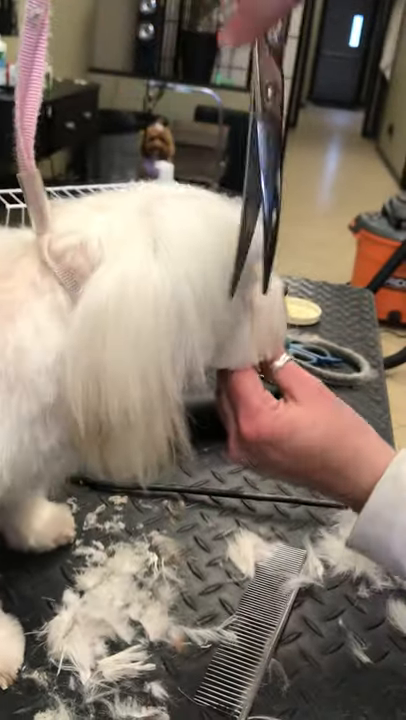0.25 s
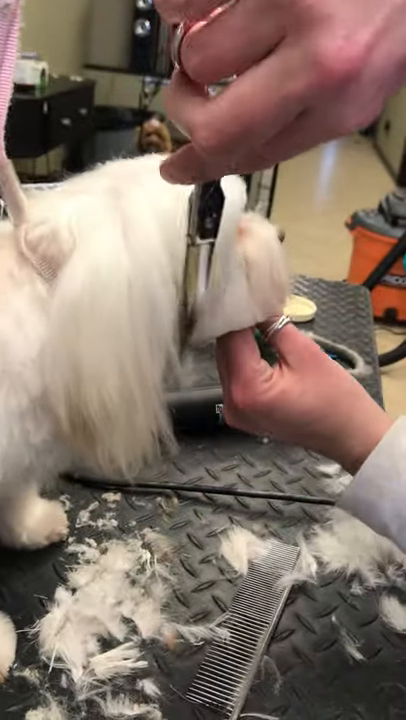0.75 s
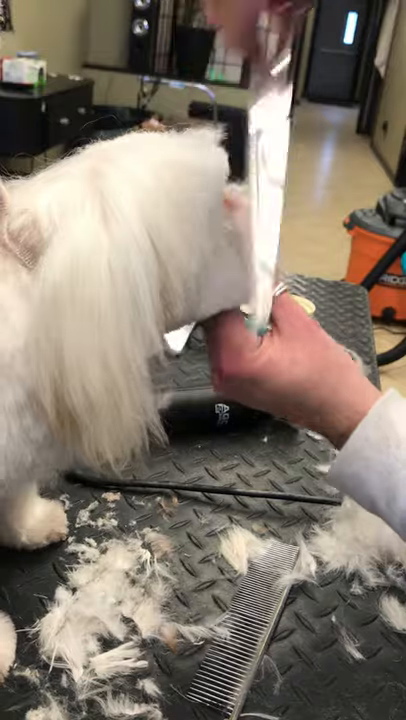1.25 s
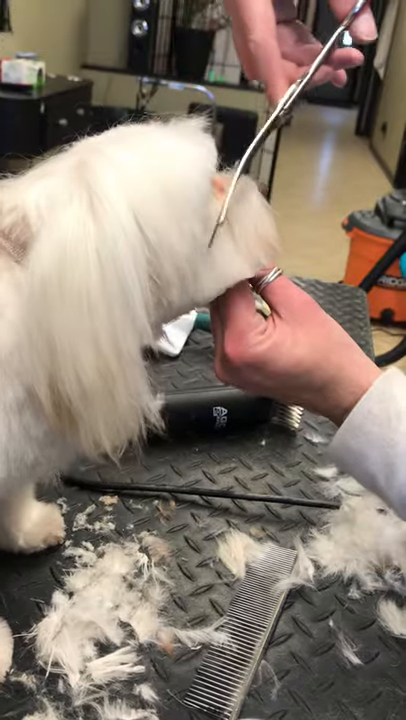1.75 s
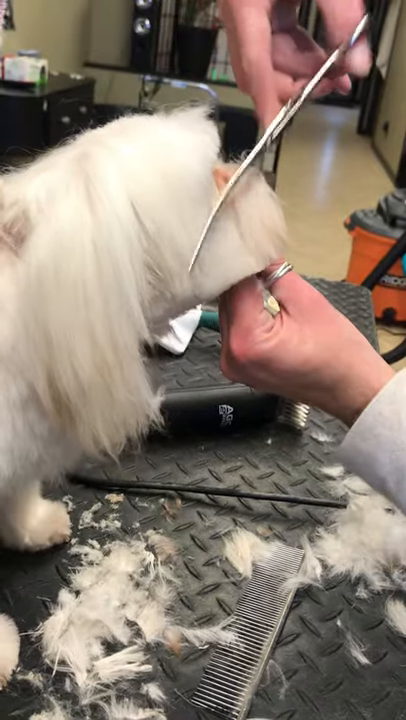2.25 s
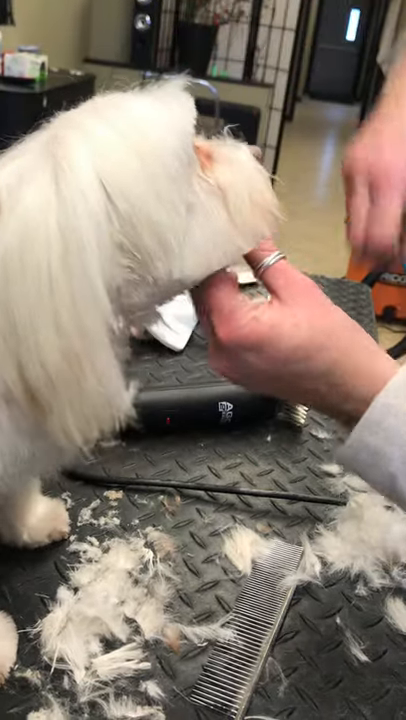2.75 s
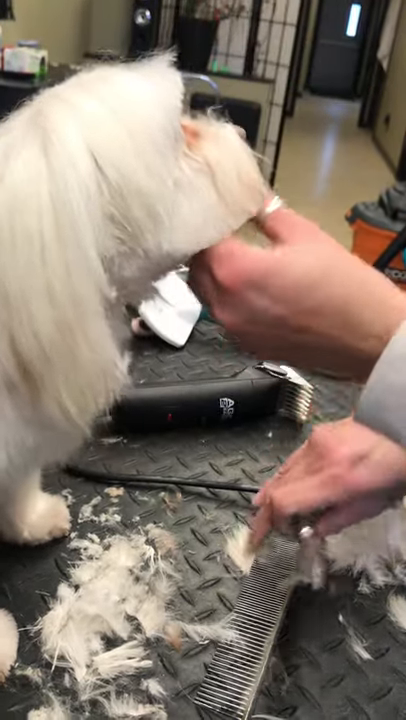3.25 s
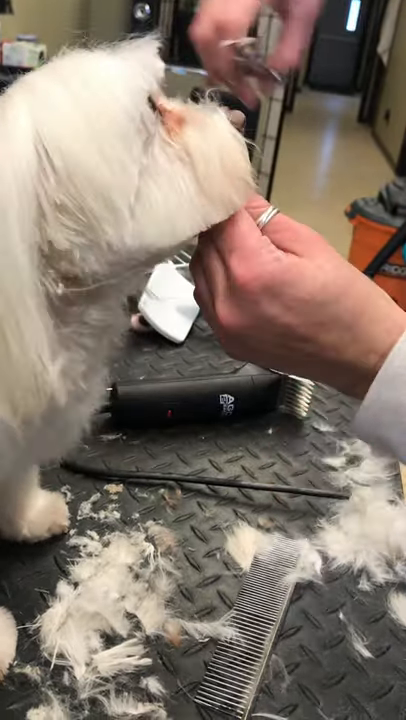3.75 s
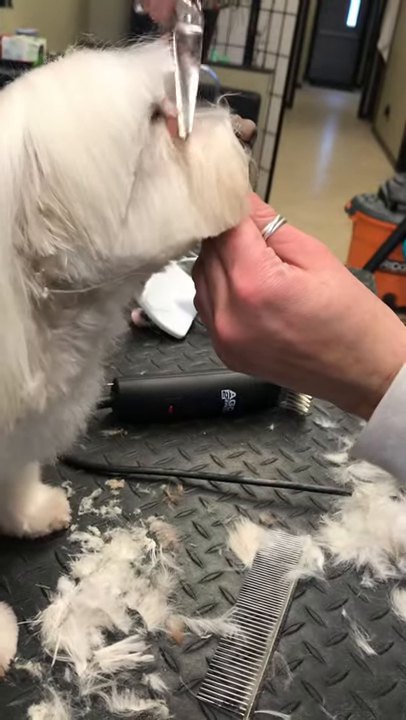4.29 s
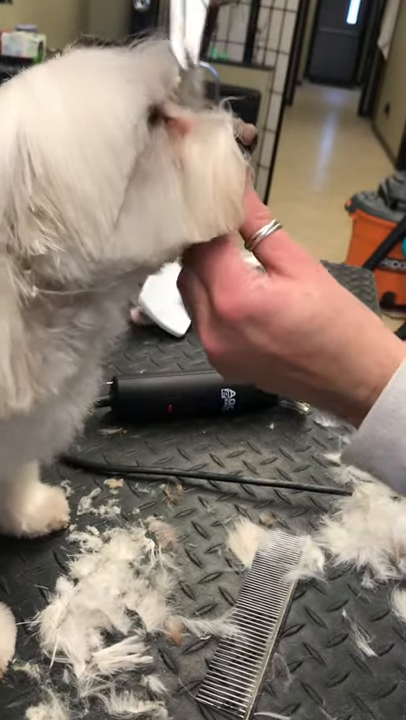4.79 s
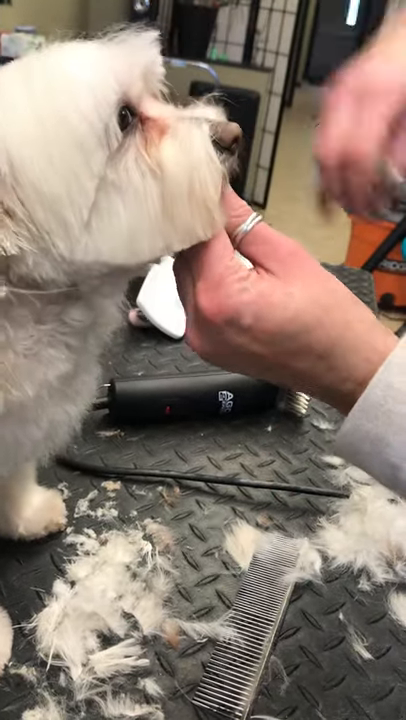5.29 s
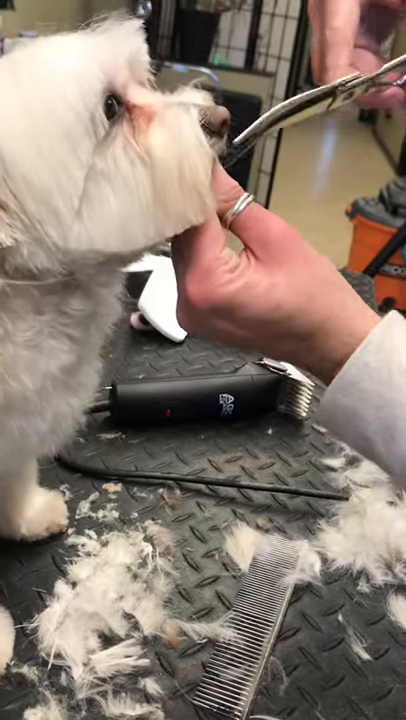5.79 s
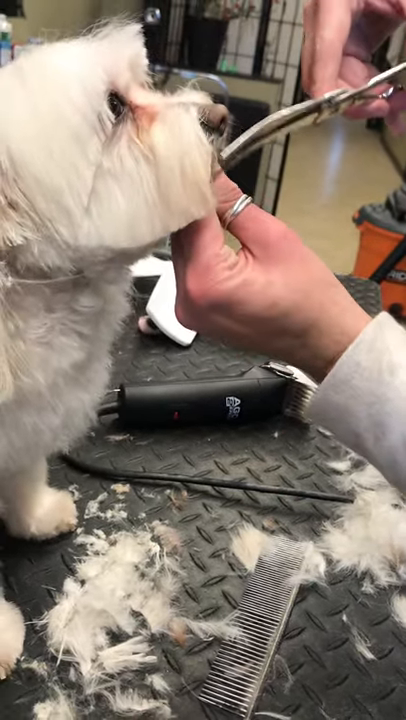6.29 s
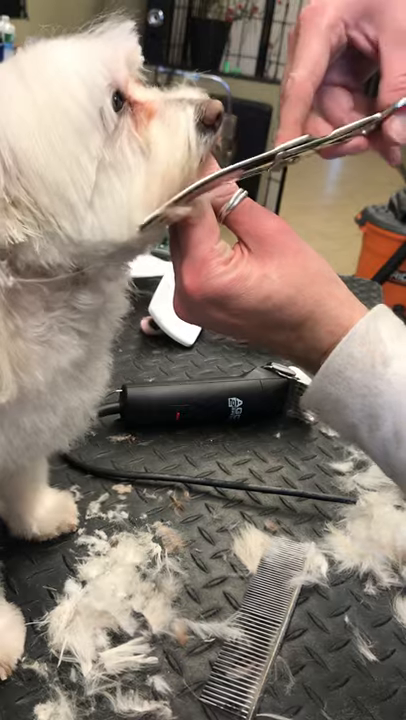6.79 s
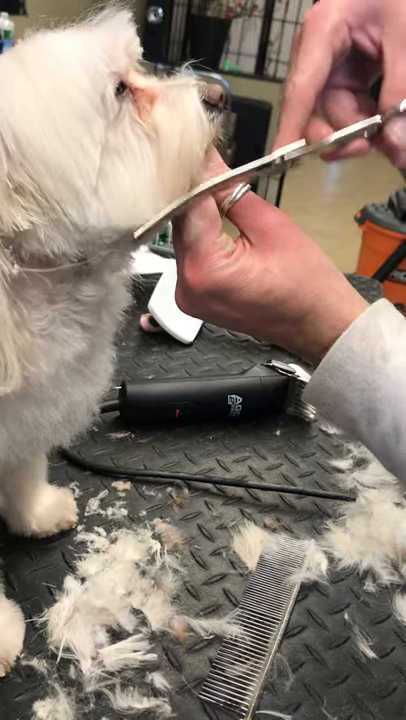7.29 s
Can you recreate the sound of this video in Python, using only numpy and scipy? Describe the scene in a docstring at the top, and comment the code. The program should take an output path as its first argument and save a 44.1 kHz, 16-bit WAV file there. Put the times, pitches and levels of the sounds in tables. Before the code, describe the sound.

Close, crisp steel scissor snips come in spaced runs in a quiet small room, interrupted midway by soft pats and a quick tool clatter.

```python
"""Small room, rubber-topped table: steel grooming scissors trim a small dog's face over ventilation hum.
Blades: stick-slip noise through resonances, scraping open, shearing shut; damped bursts click at the stops.
Midway a steel tool knocks and jingles on the table: noise bursts plus decaying steel and table modes.
Sleeve and coat rustle, hand pats: shaped noise. Ventilation: wavering tones, low rumble, faint hiss."""
import sys
import numpy as np
from scipy import signal
from scipy.fft import rfft, irfft, next_fast_len
from scipy.io import wavfile
from scipy.ndimage import map_coordinates

SR = 44100
rng = np.random.default_rng(int(sys.argv[2]) if len(sys.argv) > 2 else 0)


def dump_mix(stems):
    """Bounce the given channels to the path in sys.argv[1] as a 16-bit WAV at rate SR."""
    frames = np.atleast_2d(stems).T  # one column per channel
    limited = np.clip(frames, -1, 1)  # hard clip at full scale
    pcm = np.round(limited * 32767).astype(np.int16)
    wavfile.write(sys.argv[1], SR, pcm)


N = 332514


def amp(db):
    """dB to amplitude ratio."""
    return 10 ** (np.asarray(db) / 20)


def unit(x):
    """Scale to rms 1."""
    return x / np.sqrt(np.mean(x ** 2) + 1e-20)


def white(size=N):
    """White noise, rms near 1."""
    return rng.standard_normal(size)


def along(points, hz):
    """Interpolate (Hz, value) points on a log frequency axis."""
    f, v = np.transpose(points)
    return np.interp(np.log(hz + 1), np.log(f + 1), v)


def curve(rows):
    """Interpolate (s, value) rows to one value per sample."""
    s, values = np.transpose(rows)
    return np.interp(np.arange(N) / SR, s, values)


def wobble(rate_hz, size=N):
    """Smooth random curve, rate_hz knots per second."""
    knots = rng.standard_normal(int(size * rate_hz / SR) + 4)
    return map_coordinates(knots, [np.arange(size) * rate_hz / SR])


def filtered(x, response):
    """Multiply the spectrum of x by response(Hz)."""
    m = next_fast_len(len(x) + 8192)
    return irfft(rfft(x, m) * response(np.fft.rfftfreq(m, 1 / SR)), m)[:len(x)]


def coloured(x, spectrum):
    """Shape x with a (Hz, dB) spectrum, rms 1."""
    return unit(filtered(x, lambda hz: amp(along(spectrum, hz))))


def tilted(spectrum, slope_db_per_oct):
    """Add a constant slope to a (Hz, dB) spectrum."""
    return [(hz, db + slope_db_per_oct * np.log2(hz)) for hz, db in spectrum]


def narrow(hz, width_hz, size):
    """Narrow noise of rms 1 around a pitch that may move."""
    phase = 2 * np.pi * np.cumsum(hz * np.ones(size)) / SR
    return unit(wobble(width_hz, size) * np.sin(phase) + wobble(width_hz, size) * np.cos(phase))


def tone(hz, rms_db):
    """Sine of a moving pitch and rms level."""
    return np.sqrt(2) * amp(rms_db) * np.sin(2 * np.pi * np.cumsum(hz) / SR)


def swells(rows, rest_db):
    """Gain that rises, holds and falls for each row; powers add to a resting level."""
    t = np.arange(N) / SR
    power = amp(rest_db) ** 2
    for start, end, db, fade in rows:
        outside = np.maximum(np.maximum(start - t, t - end), 0)
        power = power + (amp(db) * np.exp(-outside / fade)) ** 2
    return np.sqrt(power)


def add(track, s, sound):
    """Mix a sound into the track at time s."""
    part = track[max(round(s * SR), 0):][:len(sound)]
    part += sound[:len(part)]


# decay of the room by band: f/Hz, t60/s
ROOM_T60 = [(200, 0.64), (2000, 0.34), (8000, 0.22), (15000, 0.18)]


def room(x):
    """Short diffuse tail, 4 ms late, the treble dying first."""
    hz, t, z = signal.stft(white(SR // 2), SR, nperseg=256)
    decay = amp(-60 * t / along(ROOM_T60, hz)[:, None])
    tail = signal.istft(z * decay, SR, nperseg=256)[1]
    return signal.fftconvolve(x, np.pad(tail, (SR // 250, 0)) / np.linalg.norm(tail))[:N]


# duct rumble, lowest air rumble and hiss spectra: f/Hz, relative density/dB
RUMBLE = [(30, -35), (60, -12.5), (110, 0), (150, -10), (200, -9.5), (260, -10), (320, -15.5), (400, -14),
          (470, -19.5), (700, -20.5), (1000, -24), (1600, -55)]
DEEP = [(20, -38), (35, -9), (46, 7), (54, 0), (70, -7.5), (110, -46)]
AIR = [(240, -23), (400, -10), (665, -7.5), (1140, -7), (1950, -13.5), (3840, -23.5), (4410, -40),
       (5220, -45), (10300, -52), (15800, -14.5)]
# swells of the lowest rumble: start t/s, end t/s, level/dB, fade/s
BOOM = [(.62, 1.4, -58, .15), (3.9, 4.8, -55, .2), (5.5, 7.5, -57, 0.24)]
BOOM_REST_DB = -62.5
DUCT_DB, DUCT_FADE_DB_PER_S = -55.5, 1.22
HISS_DB = -70.5


def airflow():
    """Moving air as shaped noise: easing duct rumble, swelling lowest rumble, steady hiss."""
    t = np.arange(N) / SR
    duct = amp(DUCT_DB - DUCT_FADE_DB_PER_S * t) * coloured(white(), RUMBLE)
    boom = swells(BOOM, BOOM_REST_DB) * coloured(white(), DEEP)
    return duct + boom + amp(HISS_DB) * coloured(white(), AIR)


# faint motor tones: f/Hz, level at start/dB, level at end/dB
WHINE = [(117.4, -66, -68), (204.2, -62.5, -85), (403, -73, -87.5), (620, -78.5, -89)]


def motor_whine():
    """Fading tones, each with small random drift in pitch and level."""
    out = np.zeros(N)
    for hz, first_db, last_db in WHINE:
        pitch_hz = hz + 1.53 * wobble(6)
        level_db = np.linspace(first_db, last_db, N) + 1.8 * wobble(4.4)
        out += tone(pitch_hz, level_db)
    return out


# hum pitch: t/s, f/Hz
FAN_PITCH = [(0.25, 69.2), (0.45, 69.1), (0.71, 62.76), (1.92, 62.67), (2.12, 66.0), (3.54, 62.45),
             (3.61, 65.3), (4.79, 65.06), (5.25, 67.7), (7.4, 69.2)]
# hum level: t/s, level/dB
FAN_LEVEL = [(0.0, -83), (0.33, -52), (0.38, -59.5), (1.28, -49.5), (1.36, -62), (1.6, -53), (1.72, -64.5),
             (3.38, -56), (3.42, -62), (3.65, -52), (3.95, -58.5), (4.24, -49.5), (4.77, -47.5),
             (4.85, -71), (4.89, -57), (5.17, -49.5), (7.27, -61), (7.54, -77)]
# drone swells: start t/s, end t/s, level/dB, fade/s
DRONE = [(.2, .38, -55, .08), (.55, 1.2, -62, 0.13), (1.85, 2.1, -64, .1), (5.48, 5.7, -56, .15),
         (6.1, 6.35, -63, .1), (6.9, 7.2, -58.5, 0.13)]
DRONE_HZ, DRONE_RISE_HZ_PER_S, DRONE_REST_DB = 92, 1.6, -71.5


def fan_hum():
    """Low sine wavering in pitch and level, plus a weaker, higher drone creeping up."""
    drone_hz = DRONE_HZ + DRONE_RISE_HZ_PER_S * np.arange(N) / SR
    drone = swells(DRONE, DRONE_REST_DB) * tone(drone_hz, 0)
    return tone(curve(FAN_PITCH), curve(FAN_LEVEL)) + drone


def fibres(grain_db):
    """Rubbing fibres: noise with fine random grain and slower unevenness."""
    return white() * amp(grain_db * wobble(1500) + 0.8 * wobble(45))


# cloth spectrum: f/Hz, relative density/dB
CLOTH = [(240, -35), (400, -11), (459, -9.5), (615, -2), (675, -10.5), (991, -8), (1600, -7), (1980, -3),
         (3450, -5.5), (4410, -3.5), (4910, -8.5), (5550, -4.5), (9080, -11), (15100, -16), (15800, -22)]
# sleeve passes as the arm moves: start t/s, end t/s, level/dB, fade/s
SLEEVE = [(0, .02, -50, 0.058), (.3, .45, -65, 0.063), (1.45, 1.65, -72, 0.076), (2.9, 3.65, -62.5, 0.35),
          (3.7, 3.93, -61, 0.27), (4.38, 4.54, -65.5, 0.17), (5.54, 5.8, -62.5, .025),
          (6.6, 6.8, -72, 0.065)]
SLEEVE_REST_DB = -74


def sleeve_rustle():
    """Cloth rubs softly, swelling with each arm movement."""
    return swells(SLEEVE, SLEEVE_REST_DB) * coloured(fibres(grain_db=1.0), CLOTH)


# fur spectrum: f/Hz, relative density/dB
BRUSH = [(180, -34), (300, -2), (735, -33), (812, -2), (1270, 0), (1550, -2), (5030, -10), (5940, -9.5),
         (15800, -16.5)]
# hand strokes on the coat: start t/s, end t/s, level/dB, fade/s
HAND = [(0, .09, -53.5, 0.09), (.5, .6, -59, 0.2), (1.1, 1.48, -65, 0.29), (2.1, 2.6, -69.5, 0.6),
        (2.85, 3.12, -61.5, 0.17), (4.3, 5.4, -65.5, .2)]
HAND_REST_DB = -78


def coat_strokes():
    """Hand on fur: finer-grained noise that swells with each stroke."""
    return swells(HAND, HAND_REST_DB) * coloured(fibres(grain_db=0.6), BRUSH)


# sliding cloth: start t/s, end t/s, start f/Hz, end f/Hz, nominal width/Hz, level/dB
SWISHES = [(2.954, 3.156, 6360, 6330, 4030, -57.5), (2.951, 3.951, 2110, 1890, 220, -70.5),
           (3.451, 4.048, 4520, 4480, 605, -66.5), (3.457, 3.493, 5800, 4900, 3400, -57.5),
           (3.619, 3.976, 7455, 7530, 6030, -60)]


def sleeve_swishes():
    """Sliding cloth: gliding noise bands, broken up as the weave catches and lets go."""
    out = np.zeros(N)
    for start, end, from_hz, to_hz, width_hz, db in SWISHES:
        n = max(int((end - start) * SR), SR // 100)
        pitch_hz = np.linspace(from_hz, to_hz, n)
        band = sum(narrow(pitch_hz, width_hz * spread, n) for spread in (.5, 1, 2))  # soft skirts
        catches = amp(1.7 * wobble(160, n))
        add(out, start, amp(db) * np.sqrt(np.hanning(n)) * unit(band * catches))
    return out


# pat spectrum: f/Hz, relative density/dB
PAT = [(150, -10), (500, 2), (1100, 2), (2000, -3), (4000, -20), (12000, -33)]
# hand pats on the table: t/s, relative level/dB
PATS = [(2.872, -58), (2.987, -54), (3.008, -58), (3.188, -56.5)]


def pats():
    """Hand on rubber: dull noise bursts with soft onset and fast decay."""
    out, t = np.zeros(N), np.arange(SR // 8) / SR
    for s, db in PATS:
        envelope = amp(db + 5.5 - 60 * t / 0.071) * (1 - np.exp(-t / 0.0017))
        add(out, s, envelope * coloured(white(len(t)), PAT))
    return out


def struck(modes, t):
    """Decaying sines; each blow draws new strengths and phases."""
    out = np.zeros(len(t))
    for hz, db, t60 in modes:
        level_db = db + rng.normal(0, 1.5)
        out += amp(level_db - 60 * t / t60) * np.sin(2 * np.pi * hz * t + rng.uniform(0, 2 * np.pi))
    return out


# steel tool modes, table modes: f/Hz, relative level/dB, t60/s
TOOL = [(7270, -22, .08), (9290, -12, .15), (11690, -11, .1), (11830, -15, .1), (13980, -20, .07)]
TABLE = [(116, 0, .17), (165, -2, .11), (238, 0, .13), (339, -1, .13), (530, -8, .07)]
# rubber-topped table thud spectrum: f/Hz, relative density/dB
THUD = [(60, -16), (110, 0), (230, 0), (400, -5), (600, -10), (850, -12), (1100, -26), (2500, -40)]
# tool contacts: t/s, clack, ring and thud relative levels/dB, clack f/Hz
KNOCKS = [(3.2867, -41, -54, -62, 4600), (3.306, -34.5, -56, -37.5, 3280), (3.325, -36.5, -48, -41, 4180),
          (3.3332, -36, -41, -45, 3300), (3.346, -38, -44, -54, 4360), (3.363, -38, -43, -45, 4020)]


def tool():
    """Steel tool rattles on the table: each contact clacks at its own pitch, rings steel, thumps table."""
    out, t = np.zeros(N), np.arange(SR // 3) / SR
    n = len(t)
    for s, db, ring_db, thud_db, clack_hz in KNOCKS:
        crack = 0.49 * amp(-60 * t / 0.031) * coloured(white(n), CLOTH)
        clack = 1.1 * amp(-60 * t / 0.02) * narrow(clack_hz, 1040, n)
        jingle = struck(TOOL, t) * amp(3.8 * wobble(110, n))  # loose contact breaks up the ring
        add(out, s, amp(db - 7.5) * (crack + clack) + amp(ring_db) * jingle)
        thump = amp(-60 * t / 0.098) * coloured(white(n), THUD) + 0.71 * struck(TABLE, t)
        add(out, s, amp(thud_db - 3.5) * thump * (1 - np.exp(-t / 0.0014)))
    return out


# steel snap spectrum: f/Hz, relative density/dB
SNAP = [(300, -28), (1500, -29.5), (3000, -10), (6000, -5.5), (8500, -0.5), (12000, 0.5), (15500, 0.5)]


def hair_ticks(count=60, level_db=-62, spread_db=7):
    """Stray hairs flick the steel: faint short bursts at random times."""
    out, t = np.zeros(N), np.arange(SR // 100) / SR
    for when, size in rng.uniform(0, 1, (count, 2)):
        tick = coloured(white(len(t)), SNAP) * amp(-60 * t / 0.016)
        add(out, when * N / SR, amp(level_db + spread_db * size) * tick)
    return out


# blade resonances: f/Hz, width/Hz, relative level/dB
BLADES = [(2675, 106, 7.5), (4060, 89, -24), (4450, 78, 2), (5800, 69, -8), (6340, 120, 8), (7200, 300, 5),
          (8400, 170, 5), (9120, 110, 0), (9300, 180, -15), (11130, 420, -0.5), (12650, 670, -1),
          (14600, 310, -28), (15100, 190, -5)]


def blade_ring(x, scatter_db=3):
    """Parallel blade resonances; each contact feeds them differently."""
    gains = amp(rng.normal(0, scatter_db, len(BLADES)))

    def response(f):
        total = 0
        for gain, (centre, width, db) in zip(gains, BLADES):
            damping = 1j * f * width
            total = total + gain * amp(db) * damping / (centre * centre - f * f + damping)
        return total
    return filtered(x, response)


def blade_echoes(x, travel, glide):
    """Bending waves bounce between crossing point and tip: a comb that slides with the stroke."""
    reflection = .55
    round_trip = rng.uniform(.0007, .0013) * SR * (1 - glide * (travel - .5))  # samples
    at = np.arange(len(x))
    return unit(sum((-reflection) ** k * map_coordinates(x, [at - k * round_trip]) for k in range(5)))


# finger-ring bumper spectrum: f/Hz, relative density/dB
BUMP = [(200, -16), (600, -8), (1100, 9), (1900, -3), (3000, 0), (6000, -21), (14000, -28)]
# finger rings meet on rubber: t/s, relative level/dB
BUMPER = [(1.097, -42.5), (2.11, -51), (2.391, -46), (4.883, -46), (6.136, -66), (6.832, -46), (7.372, -46)]


def bumper():
    """Finger rings meet on their rubber bumper: dull, short noise taps."""
    out, t = np.zeros(N), np.arange(SR // 10) / SR
    for s, db in BUMPER:
        envelope = amp(db - 3.5 - 60 * t / 0.026) * (1 - np.exp(-t / 0.001))
        add(out, s, envelope * coloured(white(len(t)), BUMP))
    return out


# blades break free, catch or meet their stops: t/s, peak level/dB, brightness/(dB/octave), t60/s
CLICKS = [(.279, -30.5, -1, 0.028), (0.8903, -28.5, 0, 0.011), (0.908, -25.5, 1, 0.008),
          (1.0993, -18.5, 1.5, .009), (1.25, -47, -2, 0.011), (1.446, -34, -0.5, 0.021),
          (2.2226, -33.5, -4, 0.028), (2.271, -43, -4, .012), (2.3908, -28, 2, 0.011),
          (3.18, -33, -2, .006), (3.589, -20.5, 5.5, 0.0079), (3.5993, -34, 2, .006), (3.612, -39, 2, .008),
          (4.753, -29, -3.5, .006), (4.8805, -19.5, 3, .025), (5.0325, -31, 2, .012), (5.142, -34, 5, .02),
          (6.1366, -32.5, 0, 0.0069), (6.7391, -33, 9, 0.007), (6.834, -37, -3.5, 0.013),
          (6.928, -50, 11, .006), (7.041, -26.5, -3, 0.011)]


def clicks(ring_db=-10):
    """Sharp steel contact, quickly damped by the fingers, with blade echoes and ring."""
    out, t = np.zeros(N), np.arange(SR // 10) / SR
    for s, db, tilt_db, t60 in CLICKS:
        envelope = amp(-60 * t / t60) * (1 - np.exp(-t / 0.0002))
        crack = coloured(white(len(t)), tilted(SNAP, tilt_db)) * envelope
        click = blade_echoes(crack, travel=0, glide=0) + amp(ring_db) * unit(blade_ring(crack))
        add(out, s, amp(db) * click / np.abs(click).max())
    return out


LEAD_S = .01  # room for a stroke's soft start
BRIGHTENING_DB_PER_OCT = 2.8  # gained as the cut runs from pivot to tips
WIDE_HZ, WIDE_DB = 4600, -10.5  # mode that sings while the blades stand wide apart
BEND_OPEN_HZ, BEND_SHUT_HZ, BEND_DB = 2550, 5610, -17  # bending mode, rises as the crossing nears the tips


def stroke(length, from_db, to_db, tilt_db, sing_hz, spectrum, opening, glide, sing_db, ring_db,
           grain_db, chatter_db, edge):
    """Edge rubs on edge: tiny slips ring the blades, brighter towards the tips; a few modes sing."""
    length = max(length, .003)
    t = np.arange(int((length + 5 * LEAD_S) * SR)) / SR - LEAD_S
    n = len(t)
    travel = np.clip(t / length, 0, 1)
    shut = 1 - travel if opening else travel
    outside = np.maximum(np.maximum(-t, t - length), 0)
    force = amp(from_db + (to_db - from_db) * travel) * np.exp(-outside / edge)

    slips = white(n) * amp(grain_db * wobble(2500, n) + chatter_db * wobble(272, n))
    at_pivot = coloured(slips, tilted(spectrum, tilt_db - BRIGHTENING_DB_PER_OCT / 2))
    at_tips = coloured(slips, tilted(spectrum, tilt_db + BRIGHTENING_DB_PER_OCT / 2))
    friction = force * blade_echoes((1 - shut) * at_pivot + shut * at_tips, travel, glide)
    ring = np.std(friction) * unit(blade_ring(friction))
    body = (friction + amp(ring_db) * ring) / np.hypot(1, amp(ring_db))

    song = amp(sing_db) * narrow(sing_hz * (1 + glide * (travel - .5) / 4), 323, n)
    song += amp(WIDE_DB) * (1 - shut) ** 2 * narrow(WIDE_HZ, 250, n)
    bend_hz = BEND_OPEN_HZ + (BEND_SHUT_HZ - BEND_OPEN_HZ) * shut ** 3
    song += amp(BEND_DB) * narrow(bend_hz, 449.6, n) * amp(3.7 * wobble(152, n))
    return (body + force * song) / np.hypot(1, amp(sing_db))


# opening and closing friction spectra: f/Hz, relative density/dB
SCRAPE = [(400, -17), (1500, -18), (2800, -13), (6000, 2), (8000, 3), (12000, 6), (15500, 8.5)]
SHEAR = [(400, -11), (1500, -11.5), (3000, -7), (6000, 0), (9000, 0), (12500, 3), (15500, -1)]
# opening: t/s, length/s, initial level/dB, brightness/(dB/octave), singing f/Hz, singing level/dB
OPENING = [(0.299, 0.058, -52.5, -7, 7440, -9), (.89, .056, -43.5, -4.5, 2680, -15),
           (1.443, 0.053, -52.5, -6, 7830, -11), (2.224, 0.056, -57.5, -3.5, 4530, -9),
           (2.551, 0.022, -58.5, -4, 7540, -18), (3.599, 0.032, -48.5, -1.5, 7360, -8),
           (4.752, 0.045, -39.5, -2.5, 7600, -6), (5.031, .044, -46, -3.5, 6100, -10),
           (6.298, 0.053, -55.5, -1, 4560, -9), (7.041, 0.055, -54, 3, 4630, -5)]
# closing: start t/s, end t/s, final level/dB, swell/dB, brightness/(dB/octave), singing f/Hz, singing level/dB
CLOSING = [(.655, 0.735, -39.5, 24, 2.5, 6230, -5), (1.024, 1.097, -35.5, 25, 0.5, 12500, -11),
           (1.381, 1.447, -61, 5, -5, 4650, -11), (2.047, 2.088, -45.5, 13, .5, 12300, -8),
           (2.336, 2.394, -40, 24, 0, 12200, -4), (2.667, 2.714, -55.5, 7, -1.5, 7640, -8),
           (3.165, 3.188, -57, -2, 0, 7500, -5), (4.291, 4.32, -49.5, 6, -1.5, 6100, -6),
           (4.437, 4.477, -62, 0.5, -3.5, 7440, -14), (4.559, 4.606, -51.5, 17, -.3, 8220, -6),
           (4.841, 4.886, -35.5, 14, 1, 6300, -7), (5.103, 5.15, -44.5, 15, -2, 9040, -9),
           (6.12, 6.137, -52, 5, 3, 4070, -9), (6.681, 6.773, -56.5, 14, 1, 4600, -9),
           (7.305, 7.373, -40.5, 26, .5, 12700, -8)]
# thick hair holds up the stroke: t/s, length/s
STALLS = [(0.735, 0.0018), (1.082, 0.0084), (2.062, 0.0072), (2.375, 0.0089), (4.299, 0.0031),
          (4.594, 0.0046), (4.874, 0.0038), (6.131, .004), (6.75, 0.018), (7.346, 0.014)]
# edges bite through a tuft: t/s, length/s, level/dB, brightness/(dB/octave), singing f/Hz
BITES = [(.716, .008, -42, 3, 6230), (1.062, .009, -44, 0, 4050), (2.109, .005, -52.5, 0, 6230),
         (2.366, 0.0059, -49, 3, 6250), (6.715, .007, -52, 11, 12800), (6.734, 0.0055, -50.5, 9, 12600),
         (6.808, 0.0076, -50, 0, 2730), (6.818, 0.013, -55, 0, 6300), (7.3365, .004, -49.5, 6, 4750)]
FADE_DB_PER_S = 175  # opening scrape dies away as the blades part
STALL_DB = -19


def snips():
    """Opening scrapes ring and fade; closing shears mostly swell, stall in thick hair, bite through tufts."""
    out, t = np.zeros(N), np.arange(N) / SR
    for s, length, db, tilt_db, hz, sing_db in OPENING:
        add(out, s - LEAD_S, stroke(
            length, db, db - FADE_DB_PER_S * length, tilt_db, hz, SCRAPE, opening=True, glide=-0.146,
            sing_db=sing_db, ring_db=-7, grain_db=3, chatter_db=1.2, edge=.003))
    for start, end, db, swell_db, tilt_db, hz, sing_db in CLOSING:
        add(out, start - LEAD_S, stroke(
            end - start, db - swell_db, db, tilt_db, hz, SHEAR, opening=False, glide=0.121,
            sing_db=sing_db, ring_db=-9.0, grain_db=5.0, chatter_db=1.7, edge=0.0021))
    stalled = sum(np.exp(-(2 * (t - s) / length) ** 2) for s, length in STALLS)
    out *= amp(STALL_DB * stalled)
    for s, length, db, tilt_db, hz in BITES:
        add(out, s - LEAD_S, stroke(
            length, db, db, tilt_db, hz, SHEAR, opening=False, glide=0.124,
            sing_db=-6.5, ring_db=-5.0, grain_db=5.0, chatter_db=0.0, edge=0.0012))
    return out


def scene():
    """Scissors, table and handling are close and excite the room; rustle and ventilation stay dry."""
    background = airflow() + motor_whine() + fan_hum()
    rustle = sleeve_rustle() + coat_strokes()
    near = sleeve_swishes() + pats() + tool() + hair_ticks() + bumper() + clicks() + snips()
    return (background + rustle + near + amp(-16.5) * room(near))[None]


TOP_HZ = 16000


def record(dry):
    """Band limit: nothing passes from TOP_HZ up."""
    return np.array([filtered(channel, lambda hz: hz < TOP_HZ) for channel in dry])


dry = scene()
out = record(dry)
dump_mix(out)
```